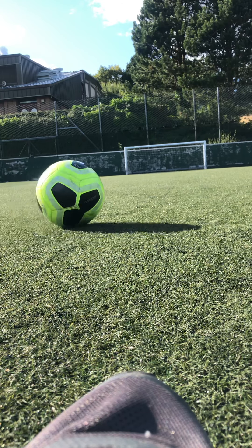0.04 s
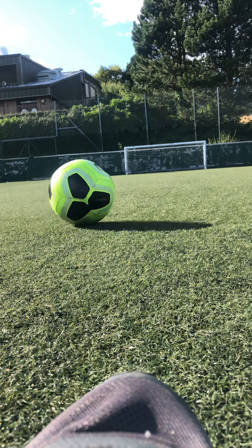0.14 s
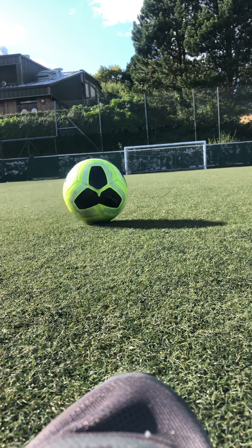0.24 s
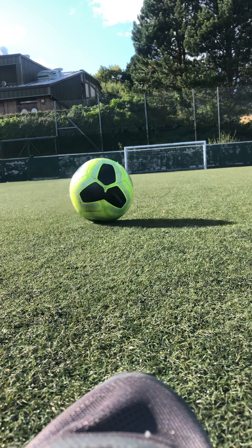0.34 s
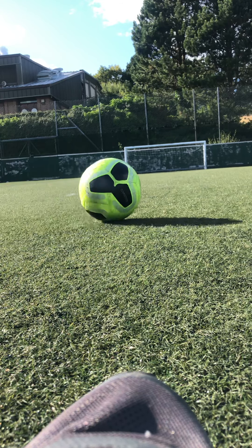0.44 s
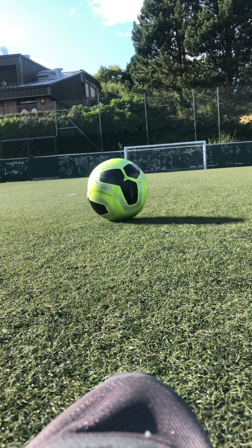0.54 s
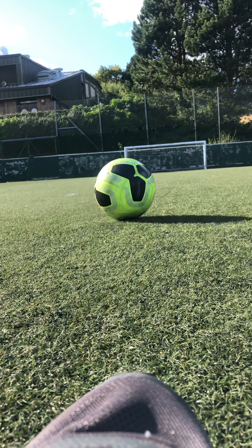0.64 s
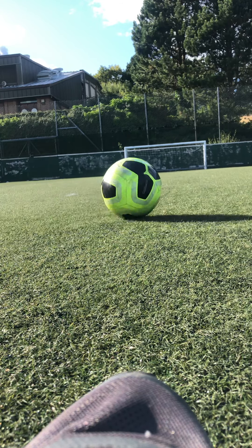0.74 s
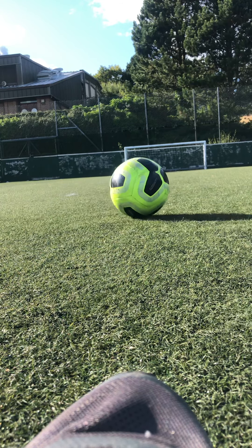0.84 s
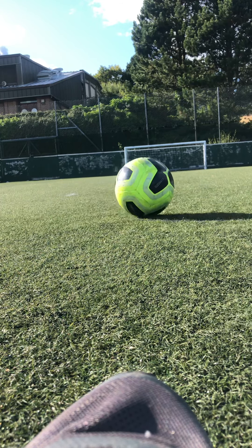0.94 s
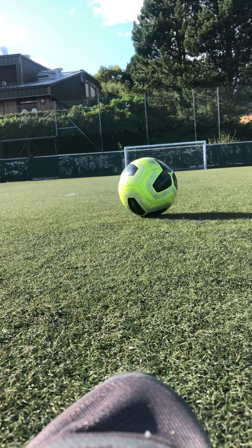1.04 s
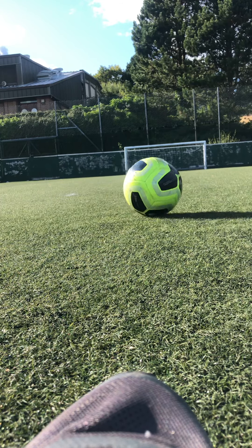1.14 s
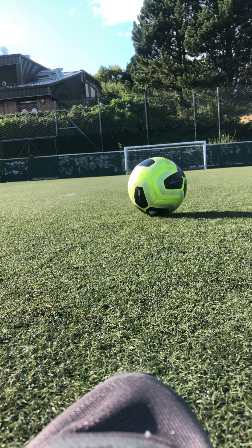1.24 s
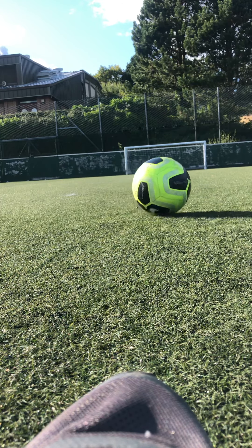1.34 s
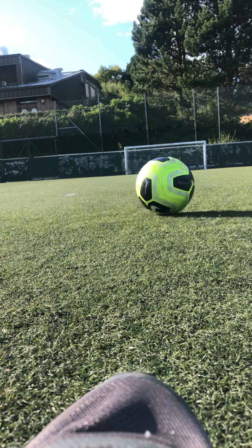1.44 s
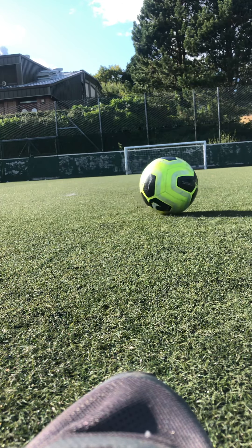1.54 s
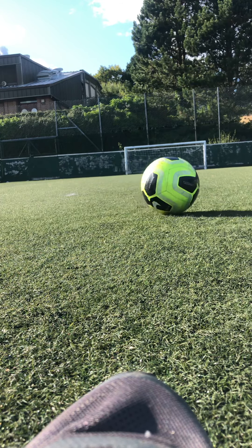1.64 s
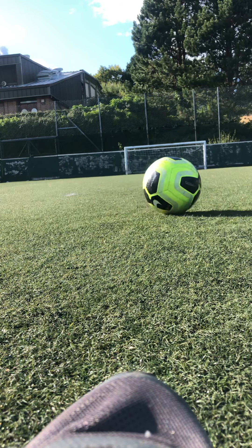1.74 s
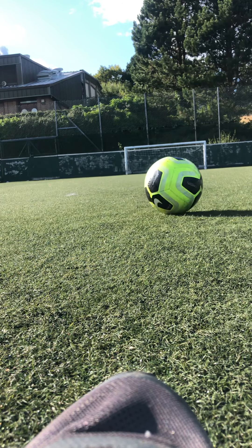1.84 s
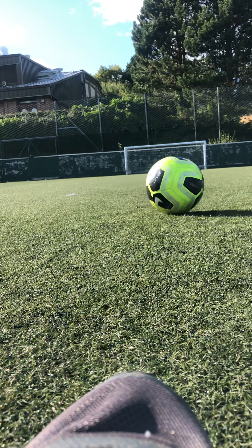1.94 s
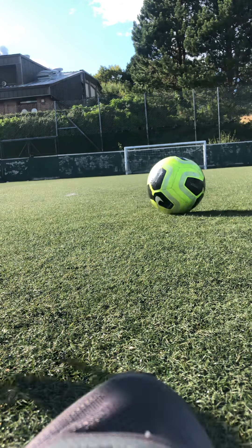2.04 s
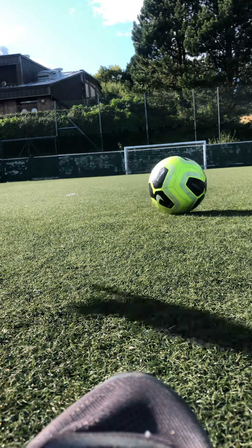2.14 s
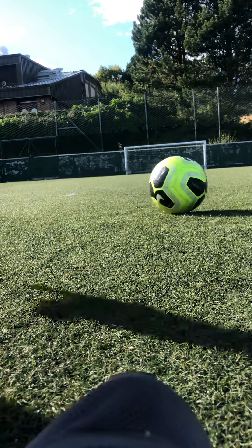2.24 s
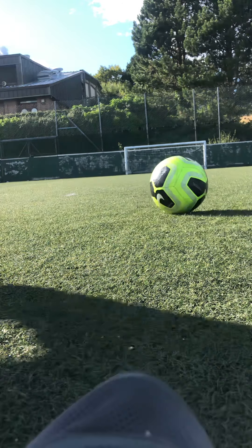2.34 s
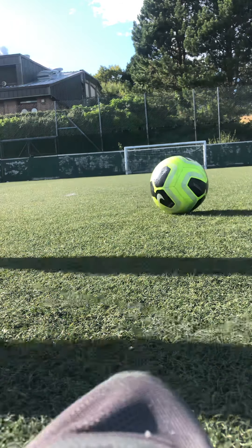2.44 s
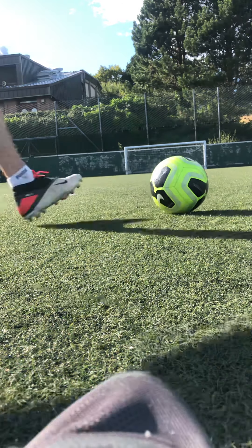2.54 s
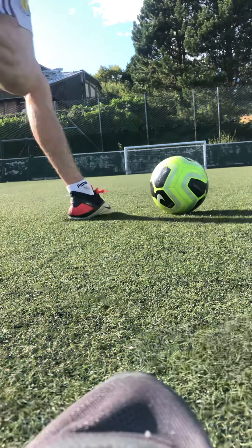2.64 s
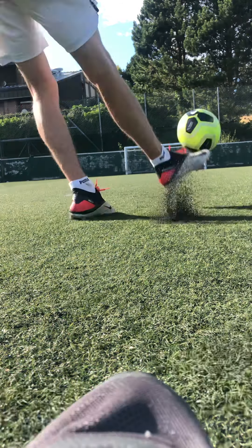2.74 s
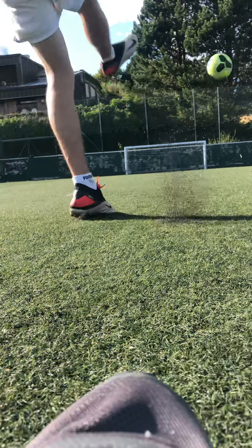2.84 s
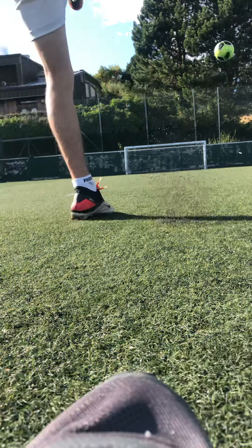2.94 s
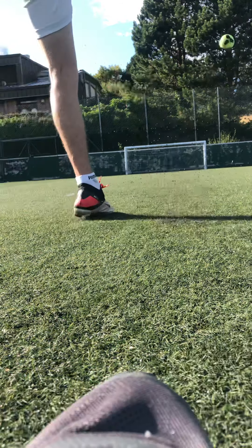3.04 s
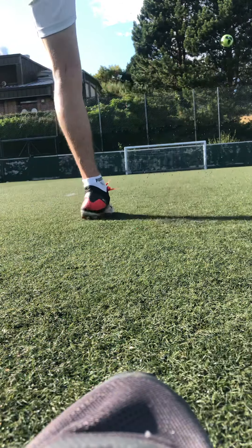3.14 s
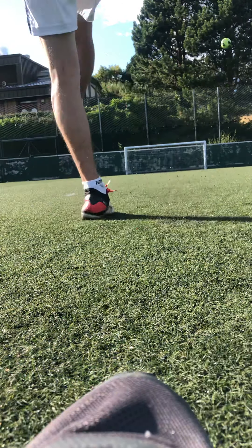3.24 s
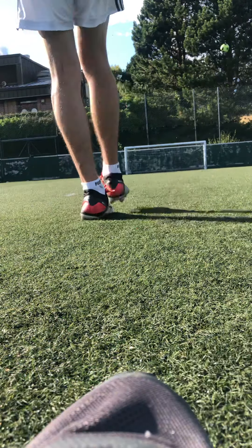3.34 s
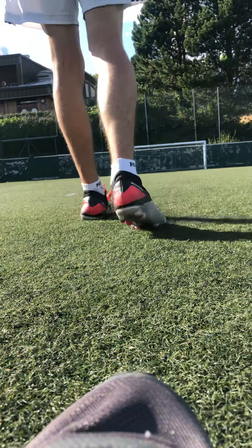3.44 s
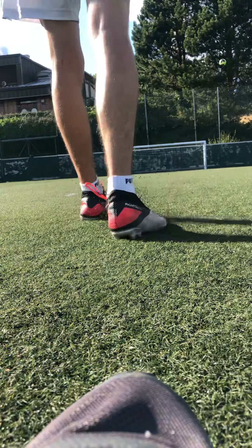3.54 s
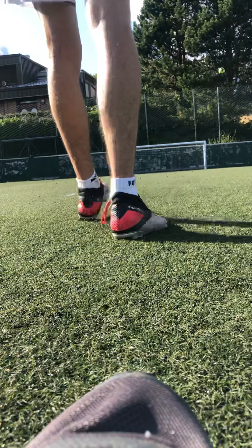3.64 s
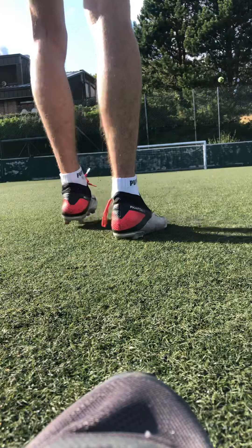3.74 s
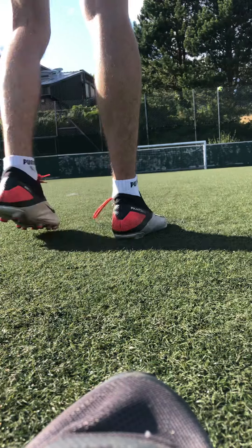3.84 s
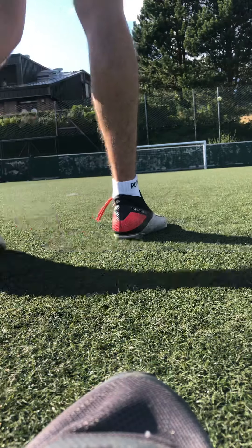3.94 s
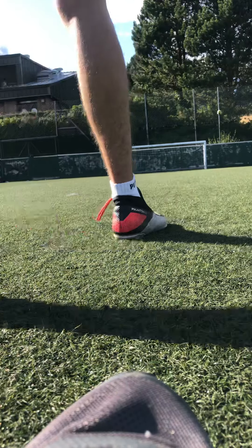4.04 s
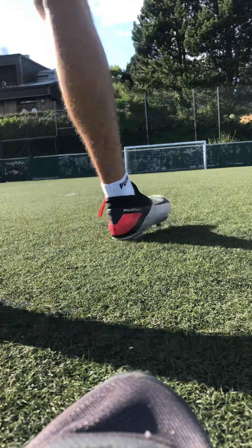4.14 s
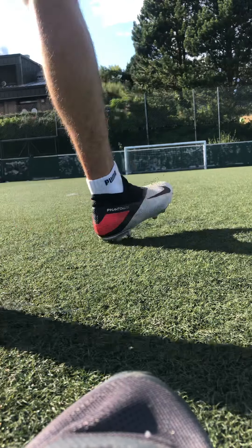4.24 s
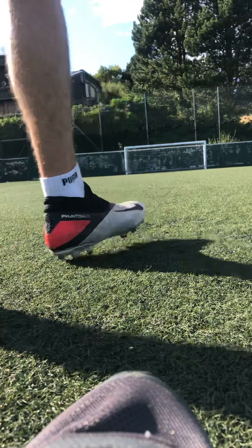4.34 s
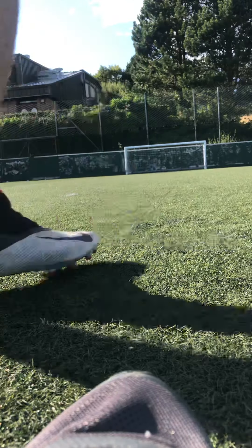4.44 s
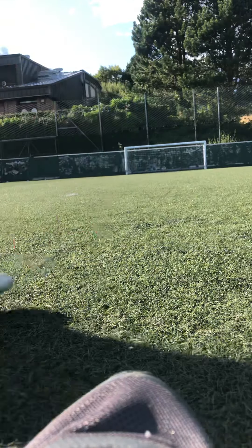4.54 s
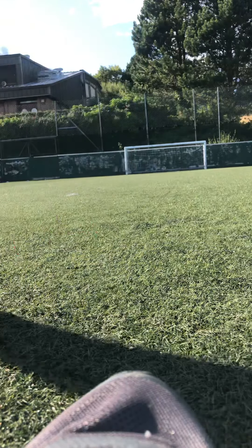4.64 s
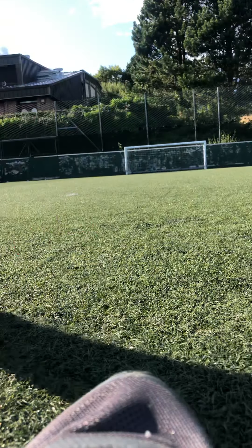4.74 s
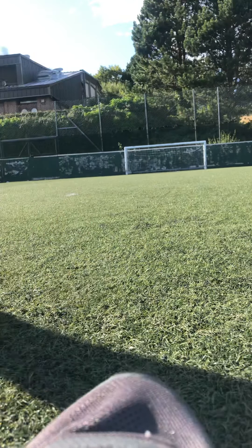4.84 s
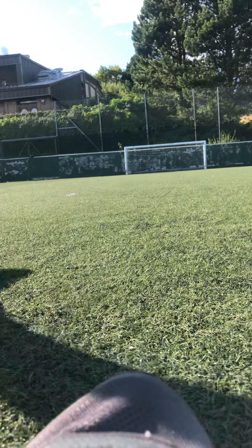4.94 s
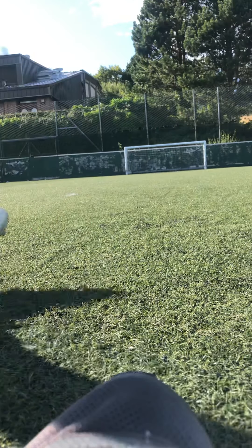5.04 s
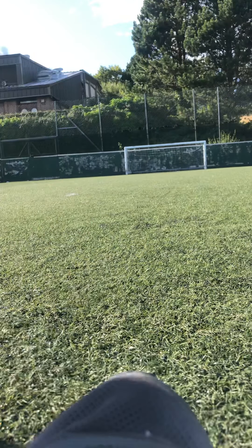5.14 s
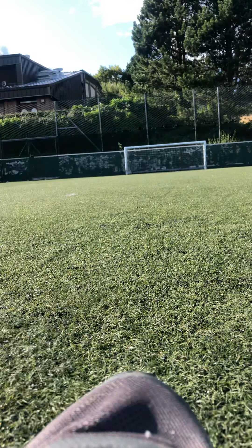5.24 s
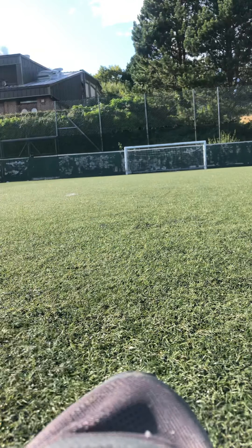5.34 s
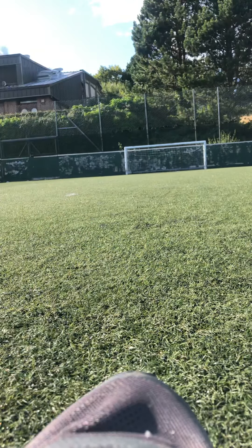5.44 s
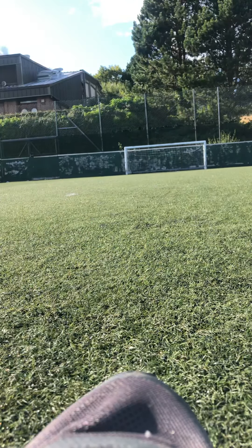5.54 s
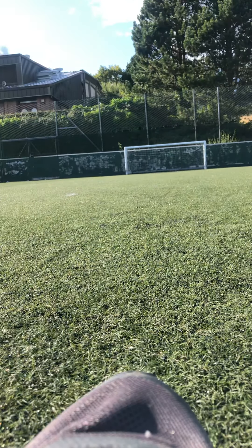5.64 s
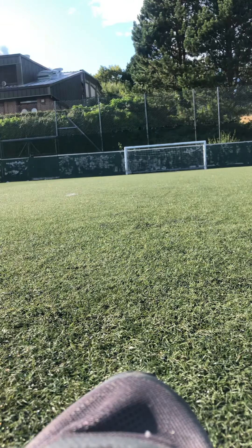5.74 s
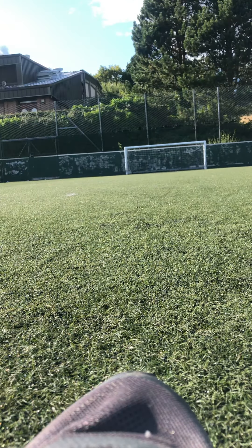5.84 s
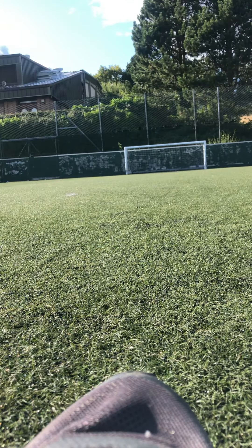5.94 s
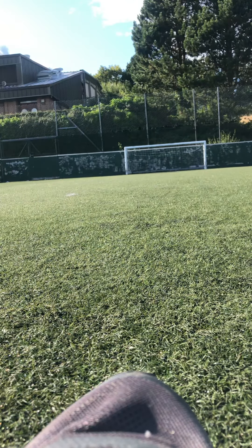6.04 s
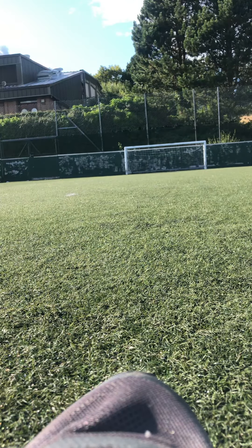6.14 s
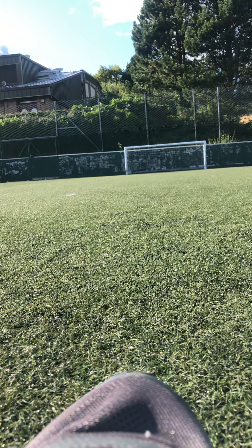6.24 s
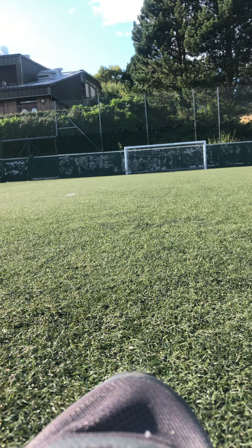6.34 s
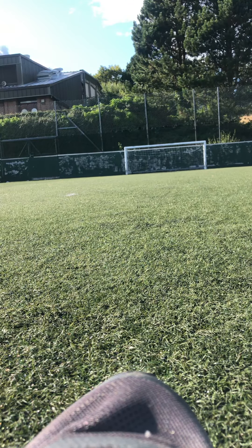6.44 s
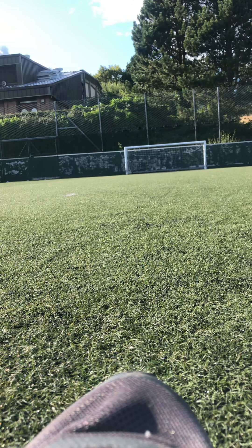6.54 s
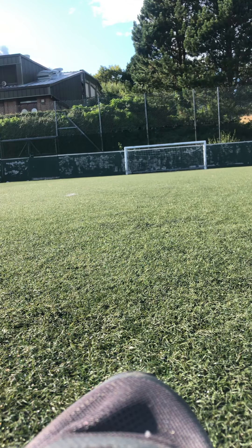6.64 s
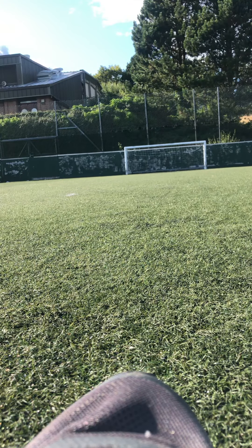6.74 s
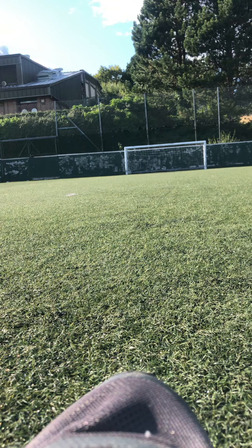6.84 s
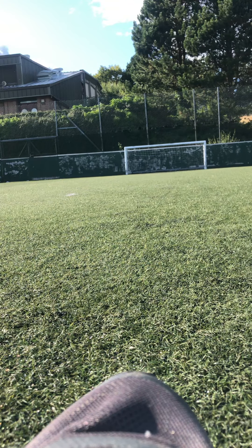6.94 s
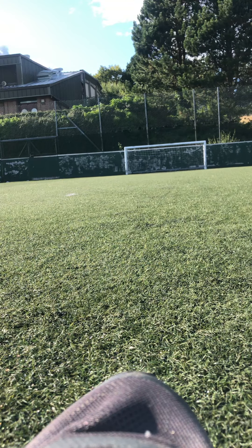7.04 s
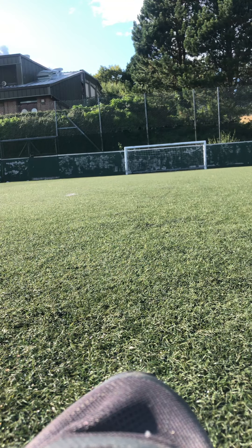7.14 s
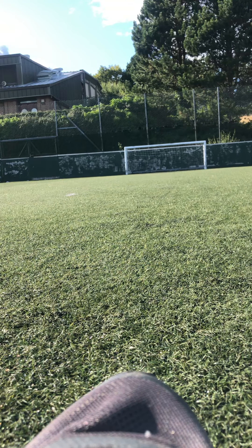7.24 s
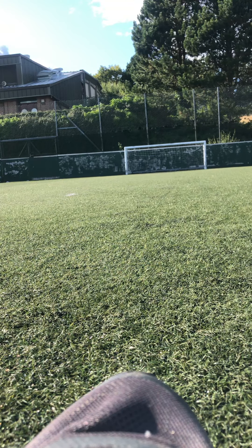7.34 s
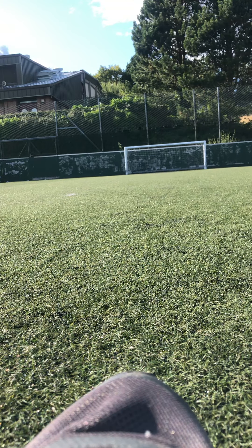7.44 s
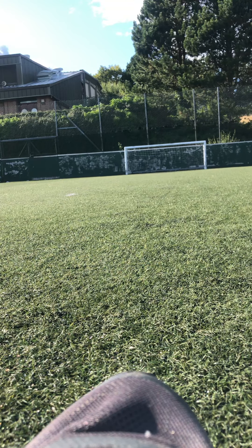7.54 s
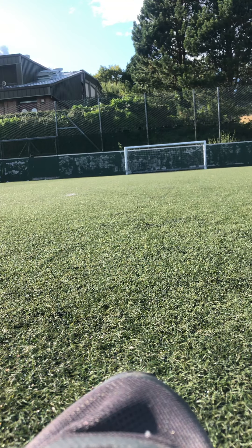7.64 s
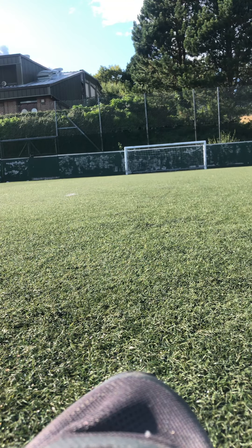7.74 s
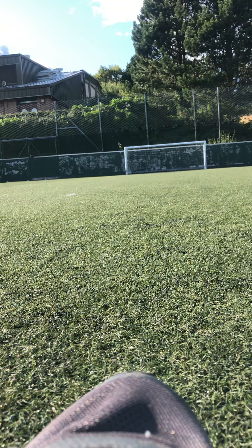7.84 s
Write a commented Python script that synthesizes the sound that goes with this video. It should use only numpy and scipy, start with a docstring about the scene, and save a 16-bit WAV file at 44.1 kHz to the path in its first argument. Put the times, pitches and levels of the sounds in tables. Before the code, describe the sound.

A short run-up on plastic grass ends in a hard, close football kick that echoes round the pitch, with a light spray of grit. Studded boots knock and scuff past a microphone lying on the ground. The ball hits a wire fence with a boom and a jingle, then drops and bounces in the distance, with one hollow clack from the boards. Quiet traffic hums throughout and a bird chirps faintly.

```python
"""A football kicked into a fence

On artificial turf, a player runs up, brushes the plastic grass and kicks hard, close to the microphone.
The ball thuds, the air inside it rings, rubber crumbs spray, and the player walks on. The ball crashes
into a wire fence and bounces far off, and something clacks against the boards around the pitch.
A town rumbles low behind it all, and a small bird chirps."""
import sys
import numpy as np
from scipy import signal
from scipy.fft import rfft, irfft, next_fast_len
from scipy.io import wavfile

SR = 44100
rng = np.random.default_rng(int(sys.argv[2]) if len(sys.argv) > 2 else 0)


def output_pcm(signal):
    """Save a mono or channel-first signal as 16-bit PCM at the path in sys.argv[1].

    Samples are clipped to [-1, 1] before scaling.
    """
    pcm = np.clip(np.atleast_2d(signal).T, -1, 1) * 32767
    wavfile.write(sys.argv[1], SR, np.round(pcm).astype(np.int16))


N = 348457
T = np.arange(N) / SR
RING_T = T[:SR + SR // 2]  # time axis for sounds that ring on
PULSE_SIZE = 8192  # samples used to shape one impact

# A spectrum sets the balance of low and high pitches, not the loudness.
# A tilt above zero brightens a sound. A decay is the time it takes to fade by 60 dB.
# spectrum of distant traffic (f/Hz, level/dB)
TRAFFIC_SPECTRUM = [(15, -43), (25, -13), (48, -6.5), (70, -11.5), (97, 3), (130, -10), (161, -3.5),
                    (242, -10.5), (373, -11), (451, -11.5), (489, -14), (575, -14), (911, -29.5),
                    (8590, -43), (16000, -48)]
# loudness of a far engine over time (t/s, level/dB)
ENGINE_LEVELS = [(0, -53.5), (.6, -62), (.9, -51), (1.6, -52.5), (2.4, -53), (3.2, -54.5), (4.9, -50.5),
                 (5.1, -62.5), (6.4, -57.5), (7.9, -60.5)]
# spectrum of a soft blow on turf (f/Hz, level/dB)
THUD_SPECTRUM = [(25, -23), (50, 1.5), (95, 6.5), (140, 3), (220, -9), (380, -9), (650, -19), (1000, -40.5),
                 (2000, -69), (5000, -66), (15000, -82)]
# faint thuds on the pitch (t/s, level/dB, tilt/dB per octave)
FAINT_THUDS = [(.275, -41.5, -.5), (6.999, -43.5, 6)]
# lingering echo of the pitch (f/Hz, level/dB, decay/s)
PITCH_RING = [(50, -46.5, 0.67), (99.9, -39.5, 1), (199.5, -42.5, 0.98), (450, -45, .65),
              (1000, -59.5, 0.88), (2000, -63, 0.93), (4000, -60.5, 1), (8000, -70, .7), (15200, -78.5, .5)]
# footsteps: run-up, planted foot, landing, walking off (t/s, length/s, level/dB)
FOOTSTEPS = [(1.708, 0.0095, -57), (2.114, 0.018, -52), (2.413, 0.054, -53.5), (2.591, 0.061, -41.5),
             (2.659, 0.12, -51.5), (3.382, 0.064, -33.5), (3.417, 0.098, -31), (3.935, 0.13, -41.5),
             (4.885, 0.071, -52.5), (4.946, 0.21, -54.5), (5.157, 0.064, -46), (5.558, .1, -57.5),
             (6.443, 0.015, -57.5)]
# spectra of a dragging sole: its hollow rub and its grit (f/Hz, level/dB)
RUB_SPECTRUM = [(60, -14), (180, 0.5), (400, 4), (700, 2), (1250, -5.5), (1900, -18), (3500, -38)]
GRIT_SPECTRUM = [(700, -20), (2000, -3), (4000, -0.5), (8000, -5.5), (12000, -5.5), (16000, -11)]
# spectrum of a sharp click (f/Hz, level/dB)
CLICK_SPECTRUM = [(100, -25), (700, -1.5), (1300, -4), (2500, -0.5), (5000, 0), (9000, -7.5), (15000, -16)]
# clicks of studs and grit (t/s, level/dB, tilt/dB per octave)
STUD_CLICKS = [(1.709, -51, 6.5), (3.1215, -42.5, 10.5), (3.372, -38.5, 9), (3.38, -24.5, 0),
               (4.811, -44.5, -5), (4.989, -44.5, -5), (5.870, -43, -5), (5.898, -43, -6),
               (6.009, -36, 11.5)]
# two brief falling peeps (t/s, length/s, f/Hz, level/dB)
PEEPS = [(1.991, .01, 2080, -59.5), (4.749, 0.016, 7270, -57.5)]
# starts of the bird's repeated note (t/s)
NOTE_TIMES = [4.89, 5.198, 5.474, 5.759, 6.46]
# spectrum of a hard knock (f/Hz, level/dB)
KNOCK_SPECTRUM = [(30, -22), (80, -3.5), (170, 0), (330, -4), (700, 1.5), (1100, -6.5), (1800, -30.5),
                  (4000, -38), (15000, -60)]
# heels and soles striking the ground (t/s, level/dB, tilt/dB per octave)
BOOT_KNOCKS = [(2.445, -39, -8.5), (2.631, -20, -1), (3.3943, -24.5, 0), (3.399, -20, -0.5),
               (5.870, -39.5, -8), (5.9, -51, 6.5)]
# the boot brushing the grass around the kick (t/s, length/s, rub level/dB, grit level/dB)
BOOT_SWIPES = [(2.7401, .019, -27.5, -31), (2.76, .011, -26, -41)]
# spectrum of the kick's thud and slap (f/Hz, level/dB)
KICK_SPECTRUM = [(25, -37), (50, -6.5), (85, 2.5), (135, -2), (200, -18.5), (350, -15), (650, -14.5),
                 (900, -26.5), (1500, -46), (2600, -37.5), (7000, -35.5), (15000, -49)]
# tones of the air inside the ball (f/Hz, relative level/dB, decay/s)
BALL_TONES = [(1050, -13, .16), (1744, -11, .24), (2331, 0, .19), (2912, -3, .22), (3058, -4, .4),
              (3472, -4, .19), (3735, -12, .24), (3962, -18, .25), (4393, -18, .3)]
# echoes from far walls (delay/s)
WALL_DELAYS = [.064, .1, .114, .138, .188, .258]
# boom of the fence panel and jingle of its mesh (f/Hz, level/dB, decay/s)
PANEL_BOOM = [(41.8, -50.5, 0.9), (85, -31, 1.18), (153.5, -37, 1.26), (308, -39.5, 1.18), (545, -49, 0.93),
              (875, -51, 0.44), (1480, -63, 0.69)]
MESH_JINGLE = [(1110, -67.5, 3.6), (1600, -66.5, 1.9), (2290, -56.5, 1.2), (3725, -51, 1.53),
               (5540, -49.5, 0.7), (9360, -43.5, 0.62), (11960, -70.5, .55), (16850, -64.5, 0.44)]
# ringing fence wires (f/Hz, width/Hz, relative level/dB, decay/s)
WIRE_TONES = [(1330, 140, 3, .05), (3305, 36, 1, .46), (3320, 90, -10, 1.3), (3640, 160, -9, .8),
              (7030, 50, -3, .55), (7230, 260, 1.5, .66), (7500, 420, -3, .85), (8960, 200, -2, .36),
              (9880, 200, -5, .35)]
# flat clack and hollow boom of the boards (f/Hz, level/dB, decay/s)
BOARD_CLACK = [(583, -59, 0.041), (1250, -49.5, 0.054), (2210, -75, 0.021), (4560, -46, 0.045),
               (7960, -61, 0.032), (14800, -54, 0.022)]
BOARD_BOOM = [(39, -51, 0.77), (90, -38.5, 0.9), (169, -42, 0.61), (320, -45, 0.48), (590, -72, 0.73),
              (1190, -79.5, 1), (4500, -68, 1), (12000, -78, 0.44)]


def undb(db):
    """Turn decibels into a multiplier."""
    return 10 ** (np.asarray(db) / 20)


def unit(x):
    """Scale a signal to an average strength (rms) of 1."""
    return x / np.sqrt(np.mean(x ** 2))


def add(out, s, x):
    """Mix x into out, starting at s seconds."""
    i = max(int(round(s * SR)), 0)
    out[i:i + len(x)] += x[:max(len(out) - i, 0)]


def freqs(size):
    """List the frequencies of a spectrum, kept above zero."""
    return np.maximum(np.fft.rfftfreq(size, 1 / SR), 1)


def gains(spectrum, f):
    """Join a spectrum's points into a curve that falls away beyond both ends."""
    hz, db = np.transpose(spectrum)
    edges = np.minimum(f / hz[0], 1) ** 2 * np.minimum(hz[-1] / f, 1) ** 2
    return undb(np.interp(np.log(f), np.log(hz), db)) * edges


def colour(x, spectrum):
    """Shape x with a spectrum, at strength 1."""
    size = next_fast_len(len(x))
    return unit(irfft(rfft(x, size) * gains(spectrum, freqs(size)), size)[:len(x)])


def band(size, hz, width_hz):
    """Make noise gathered around one frequency, at strength 1."""
    f = freqs(size)
    detune = (f * f - hz * hz) / (f * width_hz)
    return unit(irfft(rfft(rng.standard_normal(size)) / (1 + detune ** 2), size))


def wander(size, rate):
    """Drift between random values, rate of them each second."""
    values = rng.standard_normal(400)
    return np.interp(np.arange(size) / SR * rate, np.arange(len(values)), values, period=len(values))


def grains(size, spread_db, share):
    """Sprinkle tiny impacts of unequal size over a share of the samples."""
    hits = rng.standard_normal(size) * (rng.random(size) < share)
    return hits * undb(spread_db * np.minimum(rng.exponential(size=size), 5))


def rise(rise_s):
    """Swell from 0 towards 1."""
    return 1 - np.exp(-RING_T / rise_s)


def fade(decay_s):
    """Die away by 60 dB in decay_s seconds."""
    return np.exp(-np.log(1000) * RING_T / decay_s)


def ringing(rows):
    """Make bands of noise that each die away at their own rate."""
    hz, db, decays = np.transpose(rows)
    out = 0
    for f in np.geomspace(hz[0], hz[-1], 2 * len(hz)):
        level_db, decay_s = (np.interp(np.log(f), np.log(hz), column) for column in (db, decays))
        out = out + band(len(RING_T), f, f / 2) * undb(level_db) * fade(decay_s)
    return out


def pulse(spectrum, tilt_db=0, *, lag_s, corner_hz):
    """One short impact whose lows come late, so it sweeps downward."""
    f = freqs(PULSE_SIZE)
    # fold the log spectrum forward in time, so nothing sounds before the contact
    cepstrum = irfft(np.log(gains(spectrum, f) * undb(tilt_db * np.log2(f))))
    cepstrum[1:PULSE_SIZE // 2] *= 2
    cepstrum[PULSE_SIZE // 2 + 1:] = 0
    delay = lag_s / (1 + (f / corner_hz) ** 1.5)
    phase = 2 * np.pi * np.cumsum(delay) * SR / PULSE_SIZE
    x = irfft(np.exp(rfft(cepstrum) - 1j * phase))[:PULSE_SIZE // 2]
    return x / np.abs(x).max()


def dull(x, hz):
    """Soften the treble above hz."""
    return signal.sosfilt(signal.butter(2, min(hz, SR / 3), fs=SR, output="sos"), x)


def scatter(x, db, smear_s):
    """Rough ground and boards follow a pulse with a short, random smear of itself."""
    t = T[:PULSE_SIZE // 4]
    smear = rng.standard_normal(len(t)) * (1 - np.exp(-t / .002)) * np.exp(-t / smear_s)
    return x + undb(db) * signal.fftconvolve(x, smear / np.linalg.norm(smear))[:len(x)]


def town(traffic_db=-55, engine_hz=98):
    """Distant traffic swells gently under the wavering drone of an engine."""
    rumble = colour(rng.standard_normal(N), TRAFFIC_SPECTRUM) * undb(traffic_db + .4 * wander(N, 1.6))
    firing_hz = engine_hz * (1 + .043 * wander(N, 15))
    hum = np.sin(2 * np.pi * np.cumsum(firing_hz) / SR)
    drone = unit(hum + .98 * band(next_fast_len(N), engine_hz, 49)[:N])
    return rumble + drone * undb(np.interp(T, *np.transpose(ENGINE_LEVELS)))


def far_thud(db, tilt_db, ring, echo_db=-21):
    """A soft blow on distant turf echoes off the boards and rings round the pitch."""
    out = np.zeros(2 * SR)
    thud = undb(db) * pulse(THUD_SPECTRUM, tilt_db, lag_s=.0229, corner_hz=111)
    add(out, 0, scatter(dull(thud, 1000), db=-14.5, smear_s=.021))
    add(out, .01196, undb(echo_db) * thud)
    add(out, .03, undb(db + 15) * ring)
    return out


def faint_thuds():
    """Two soft blows sound from elsewhere on the pitch."""
    out = np.zeros(N)
    ring = dull(ringing(PITCH_RING), 480)
    for s, db, tilt_db in FAINT_THUDS:
        add(out, s, far_thud(db, tilt_db, ring))
    return out


def scuff(length, rub_db, grit_db):
    """Studs plough through plastic blades: a hollow rub with grit on top."""
    size = SR // 2
    press = np.zeros(size)
    add(press, 0, signal.windows.tukey(int(length * SR), .75))
    # bent blades keep rustling for a moment after the sole has passed
    relax = np.exp(-1 / (.06 * SR))
    press = np.maximum(press, undb(-14) * signal.lfilter([1 - relax], [1, -relax], press))
    rub = colour(grains(size, spread_db=3, share=.16), RUB_SPECTRUM)
    grit = colour(grains(size, spread_db=1, share=.52), GRIT_SPECTRUM)
    # a harder scrape snaps the blades faster and sounds brighter
    grit = dull(grit, 15000 * undb(.35 * min(grit_db + 49.5, 0)))
    return press * undb(wander(size, 160)) * (undb(rub_db) * rub + undb(grit_db) * grit)


def patter(length, db, fade_db):
    """A shower of tiny impacts fades as crumbs and blades come to rest."""
    size = min(int(length * SR), SR)
    spurts = grains(SR, spread_db=1.3, share=.06) * undb(3.5 * wander(SR, 110))
    shower = colour(spurts, [(1000, -9), (3500, .5), (8000, -2.5), (15000, -13)])[:size]
    return undb(db - np.linspace(0, fade_db, size)) * signal.windows.tukey(size, .1) * shower


def click(db, tilt_db):
    """A stud, crumb or blade makes one sharp click."""
    return undb(db) * pulse(CLICK_SPECTRUM, tilt_db, lag_s=.014, corner_hz=171.9)


def steps(ordinary_db=-42.5, rustle_s=.48):
    """Each step scuffs the grass; a harder one has louder grit and a louder rustle as blades rise."""
    out = np.zeros(N)
    for s, length, db in FOOTSTEPS:
        force_db = db - ordinary_db
        rustle_db = -71 + .6 * force_db
        add(out, s, scuff(length, db, grit_db=-56.5 + .58 * force_db))
        add(out, s, patter(rustle_s, rustle_db, fade_db=6))
        # three single blades flick upright
        for late, strength in rng.uniform(.6, 1, size=(3, 2)):
            add(out, s + late * rustle_s, strength * click(rustle_db + 19.5, tilt_db=5))
    return out


def stud_clicks():
    """Studs and grit click here and there."""
    out = np.zeros(N)
    for s, db, tilt_db in STUD_CLICKS:
        add(out, s, click(db, tilt_db))
    return out


def chirp(length, hz, glide, db):
    """One slightly unsteady note slides by a share (glide) of its frequency."""
    size = int(length * SR)
    note_hz = hz * (1 + glide * np.linspace(-.5, .5, size) + .014 * wander(size, 290))
    return undb(db) * np.hanning(size) * np.sin(2 * np.pi * np.cumsum(note_hz) / SR)


def bird():
    """A small bird peeps and repeats one rising note, smeared by the trees around it."""
    out, t = np.zeros(N), T[:SR // 4]
    for s, length, hz, db in PEEPS:
        add(out, s, chirp(length, hz, glide=-.05, db=db))
    for s in NOTE_TIMES:
        add(out, s, chirp(length=.048, hz=4320, glide=.036, db=-67))
    leaves = rng.standard_normal(len(t)) * np.exp(-t / .053)
    return out + undb(-9) * signal.fftconvolve(out, leaves / np.linalg.norm(leaves))[:N]


def knock(db, tilt_db):
    """A hard contact is smeared by the rough ground."""
    contact = pulse(KNOCK_SPECTRUM, tilt_db, lag_s=.01603, corner_hz=173)
    return undb(db) * scatter(contact, db=-10.5, smear_s=.0028)


def boot_knocks():
    """Heels and soles strike the ground."""
    out = np.zeros(N)
    for s, db, tilt_db in BOOT_KNOCKS:
        add(out, s, knock(db, tilt_db))
    return out


def boot_swipes():
    """The boot rips through the grass just before and after it meets the ball."""
    out = np.zeros(N)
    for s, length, rub_db, grit_db in BOOT_SWIPES:
        add(out, s, scuff(length, rub_db, grit_db))
    return out


def kick(start_s=2.7557, thud_db=-2.5, ring_db=-34.5):
    """The boot flattens the ball, which springs free, rings inside and echoes round the pitch."""
    out = np.zeros(N)
    thud = undb(thud_db) * pulse(KICK_SPECTRUM, lag_s=.023, corner_hz=140)
    add(out, start_s, thud)
    release = dull(pulse(KNOCK_SPECTRUM, tilt_db=-3, lag_s=.0076, corner_hz=130), 700)
    add(out, start_s + .0142, undb(-8.5) * release)
    for hz, db, decay_s in BALL_TONES:
        # spin splits each tone into a throbbing pair, which grows as the ball regains its shape
        tone = np.sin(2 * np.pi * hz * RING_T)
        twin = .3 * np.sin(2 * np.pi * (hz - 17) * RING_T + rng.uniform(0, 2 * np.pi))
        add(out, start_s, (tone + twin) * undb(ring_db + db) * rise(.028) * fade(decay_s))
    # the nearest boards answer first; walls further off are weaker and duller
    near_echo = dull(dull(thud, 750), 1000)
    add(out, start_s + .0495, undb(-17) * scatter(near_echo, db=-6, smear_s=.009))
    for delay in WALL_DELAYS:
        further = delay / WALL_DELAYS[0]
        echo = dull(dull(thud, 600 / further ** .33), 900)
        echo_db = -24.5 - 7.5 * np.log2(further)
        add(out, start_s + delay, undb(echo_db) * scatter(echo, db=-4.5, smear_s=.011))
    add(out, start_s, ringing(PITCH_RING) * rise(.017))
    return out


def crumb_spray(start_s=2.768):
    """Rubber crumbs thrown up by the kick patter down; the five biggest land early."""
    out = np.zeros(N)
    add(out, start_s, patter(length=.42, db=-54.5, fade_db=28))
    for late in rng.random(size=5):
        add(out, start_s + late * .13, click(db=-36.5 - 4 * late, tilt_db=-3))
    return out


def fence(start_s=4.1555, wires_db=-41):
    """The ball knocks into the fence: the panel booms while the wires clash, ring and settle."""
    out, t = np.zeros(N), RING_T
    boom = ringing(PANEL_BOOM) * rise(.0037)
    wires = sum(band(len(t), hz, width) * undb(wires_db + db) * fade(decay_s)
                for hz, width, db, decay_s in WIRE_TONES)
    first_clash = 1 + 2.7 * np.exp(-t / .0026)
    jingle = ringing(MESH_JINGLE) * first_clash + wires * first_clash ** .77
    # the wave runs to the posts and comes back to shake the mesh again
    returning_db = 4.3 * np.exp(-((t - .21) / .096) ** 2)
    clatter = undb(2 * wander(len(t), 228) + returning_db)
    add(out, start_s, knock(db=-20.5, tilt_db=-1.5))
    add(out, start_s, boom + jingle * clatter)
    return out


def bounces(landing_s=4.6506, flight_s=1.167):
    """The ball drops by the boards and bounces away, each time sooner, softer and with less bass."""
    out = np.zeros(N)
    ring = dull(ringing(PITCH_RING), 480)
    for k in range(4):
        echo_db = -21 if k else -4.5  # the first landing is right at the foot of the boards
        add(out, landing_s, far_thud(db=-23 - 4.5 * k, tilt_db=-1.43 + 1.35 * k,
                                     ring=ring, echo_db=echo_db))
        landing_s += flight_s
        flight_s *= .7626 + .021 * k  # softer bounces keep a little more of their speed
    return out


def boards(start_s=5.9858):
    """Something strikes the boards around the pitch: a dry clack, then a hollow boom."""
    out = np.zeros(N)
    add(out, start_s, ringing(BOARD_CLACK) + ringing(BOARD_BOOM) * rise(.0049))
    return out


def scene():
    """All the sounds meet at one microphone lying on the pitch."""
    background = town() + faint_thuds() + bird()
    player = steps() + stud_clicks() + boot_knocks() + boot_swipes()
    shot = kick() + crumb_spray() + fence() + bounces()
    return (background + player + shot + boards())[None]


def record(dry, top_hz=15900):
    """The phone clips peaks at full scale and cuts the highest treble."""
    treble_cut = signal.ellip(8, .2, 70, top_hz, fs=SR, output="sos")
    return signal.sosfilt(treble_cut, np.clip(dry, -1, 1))


dry = scene()
out = record(dry)
output_pcm(out)
```